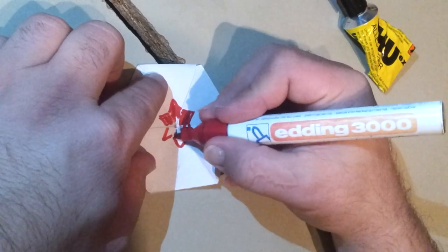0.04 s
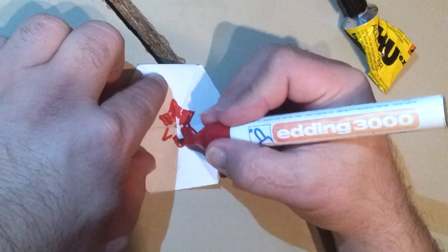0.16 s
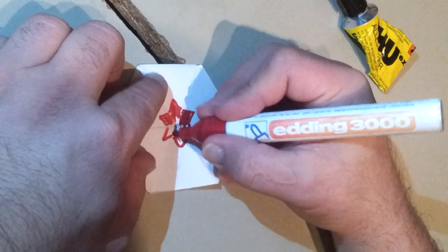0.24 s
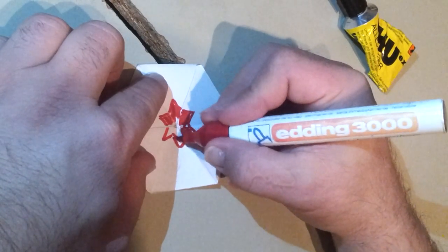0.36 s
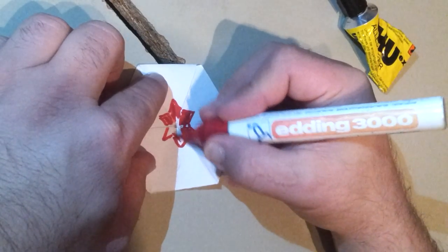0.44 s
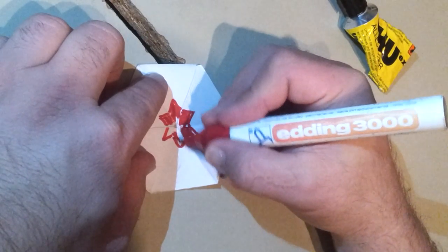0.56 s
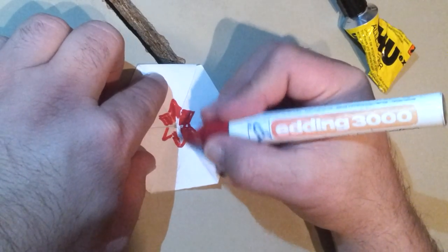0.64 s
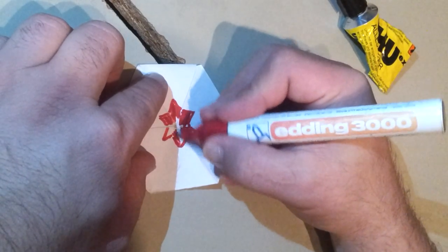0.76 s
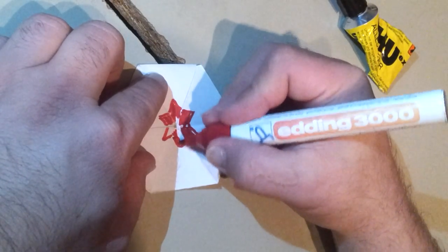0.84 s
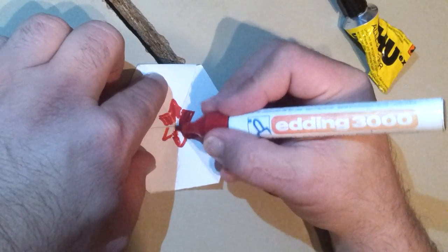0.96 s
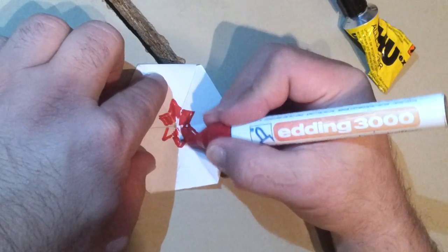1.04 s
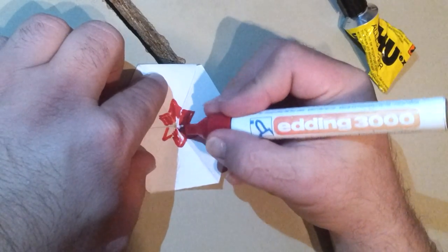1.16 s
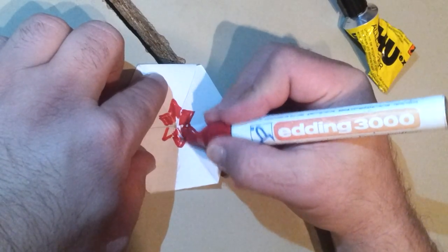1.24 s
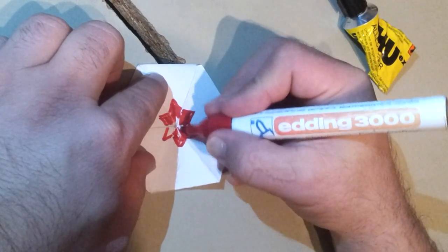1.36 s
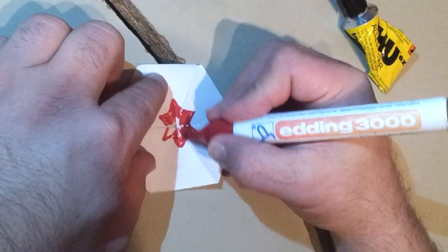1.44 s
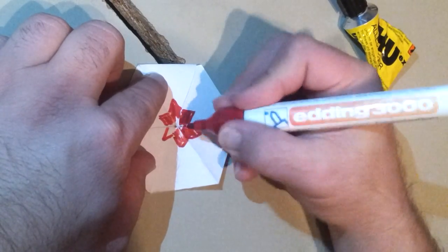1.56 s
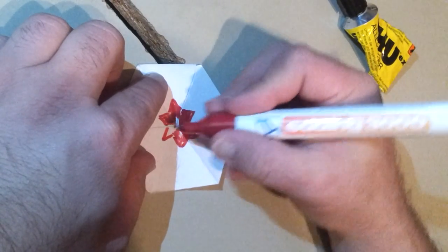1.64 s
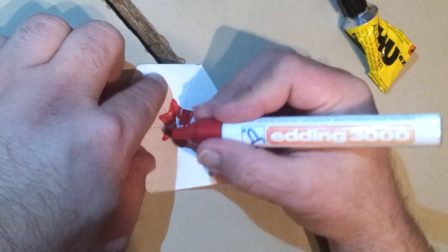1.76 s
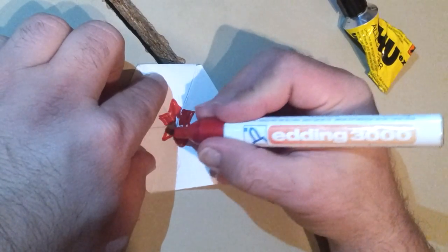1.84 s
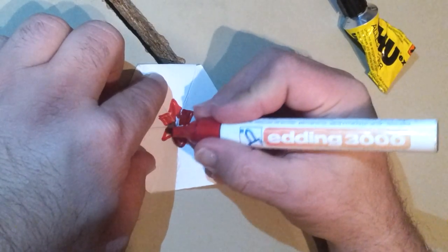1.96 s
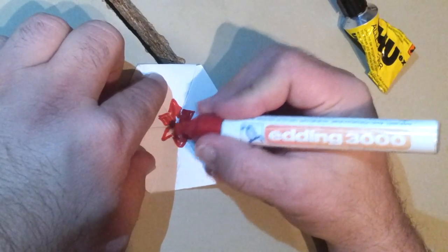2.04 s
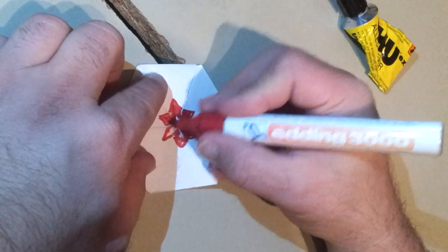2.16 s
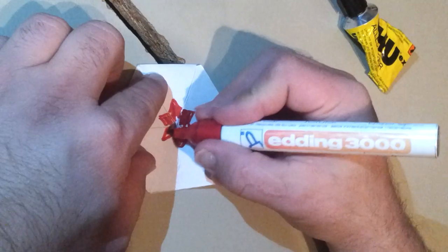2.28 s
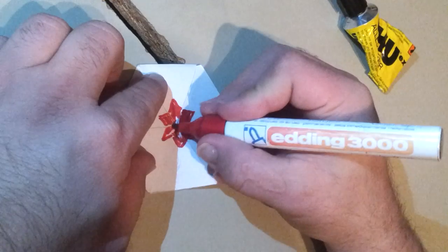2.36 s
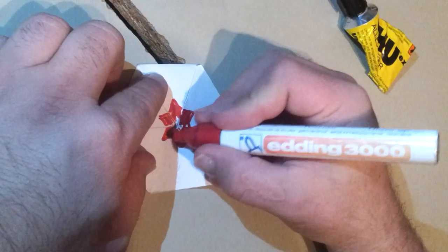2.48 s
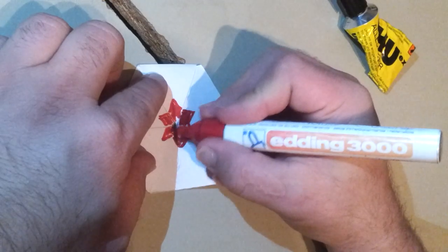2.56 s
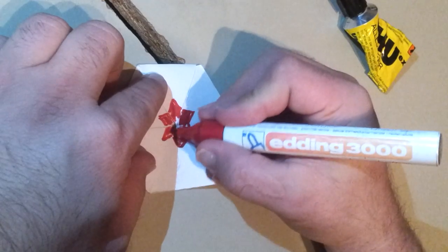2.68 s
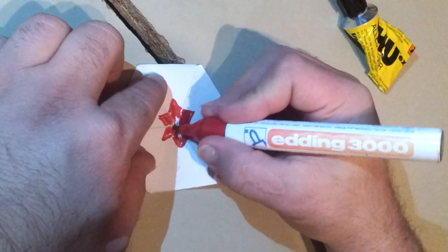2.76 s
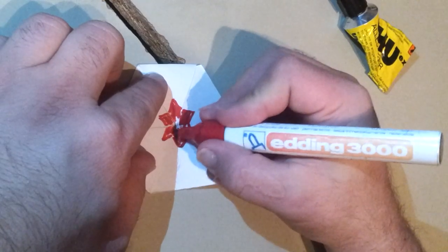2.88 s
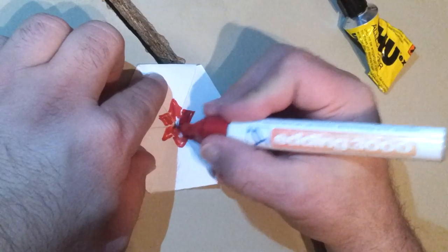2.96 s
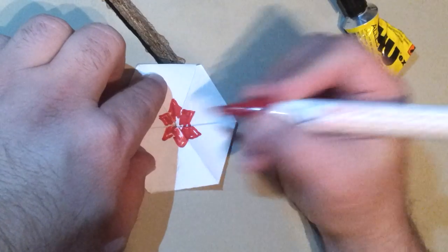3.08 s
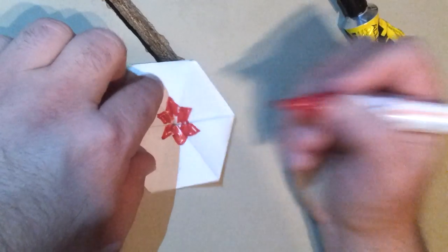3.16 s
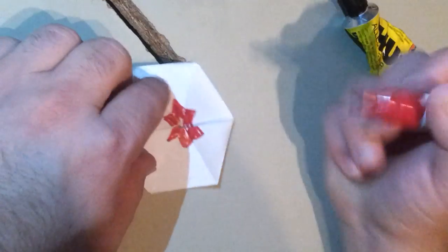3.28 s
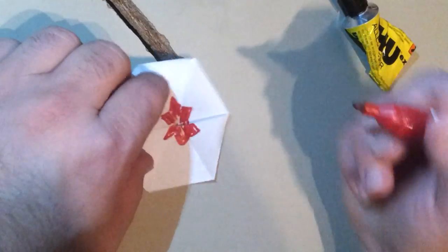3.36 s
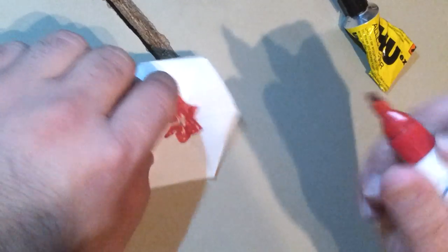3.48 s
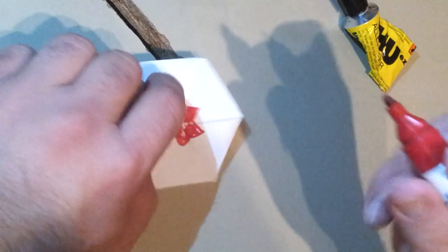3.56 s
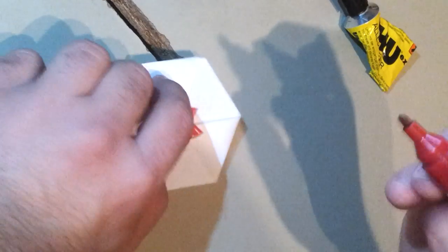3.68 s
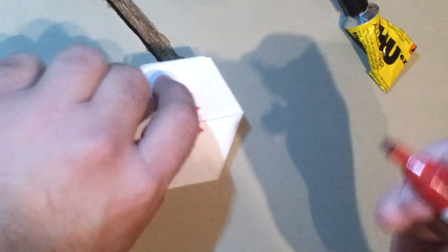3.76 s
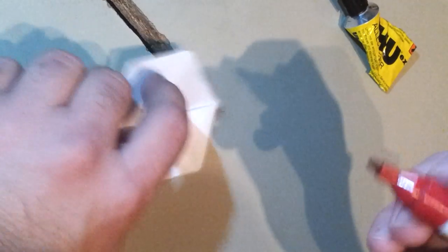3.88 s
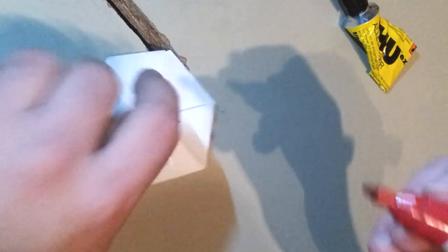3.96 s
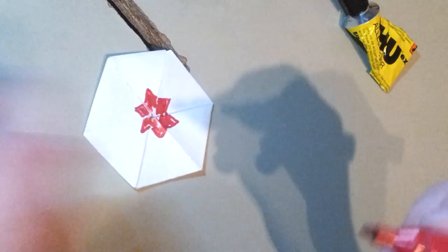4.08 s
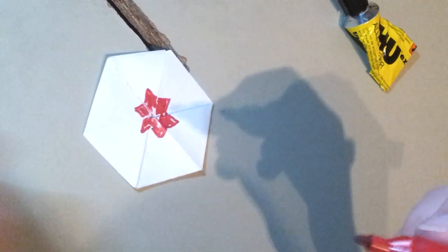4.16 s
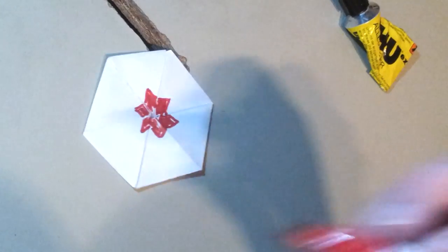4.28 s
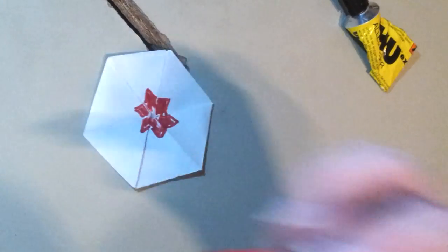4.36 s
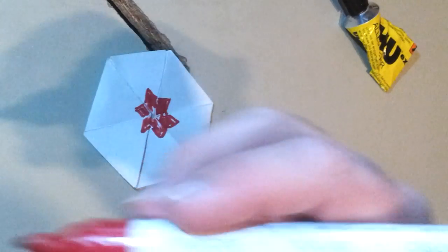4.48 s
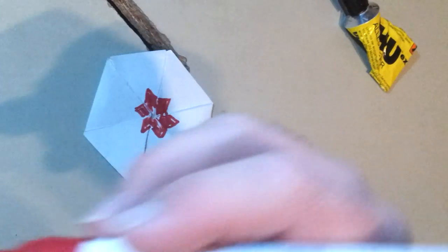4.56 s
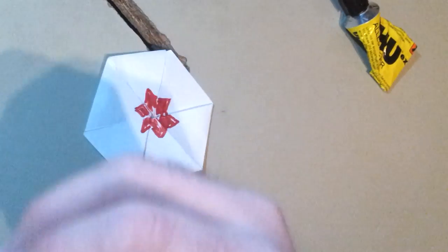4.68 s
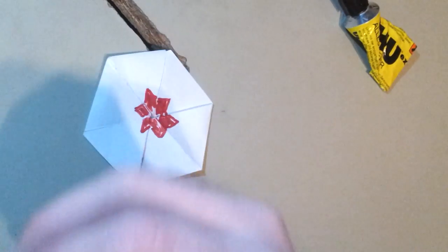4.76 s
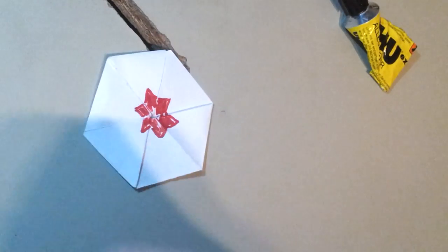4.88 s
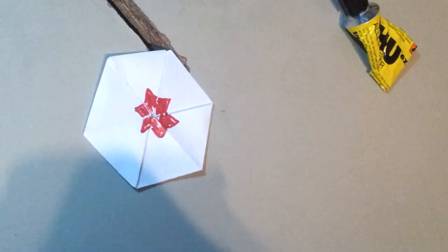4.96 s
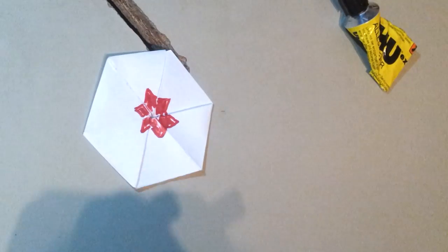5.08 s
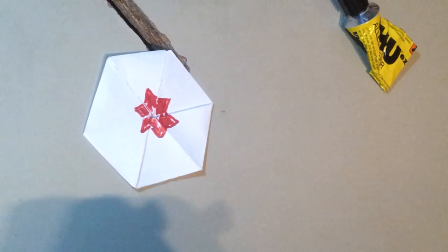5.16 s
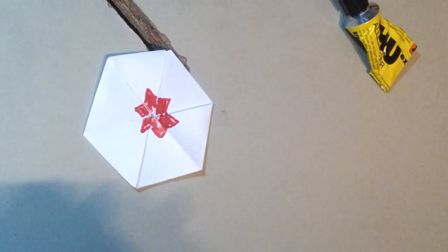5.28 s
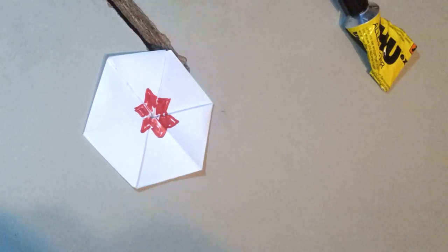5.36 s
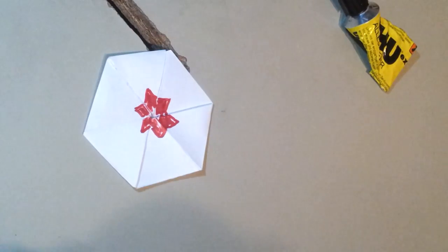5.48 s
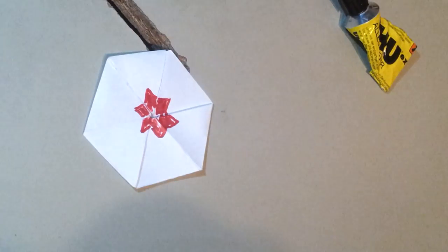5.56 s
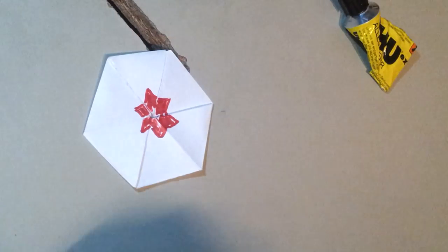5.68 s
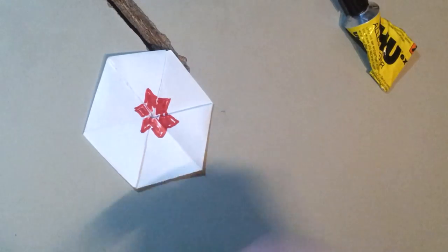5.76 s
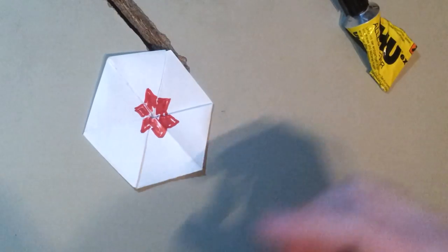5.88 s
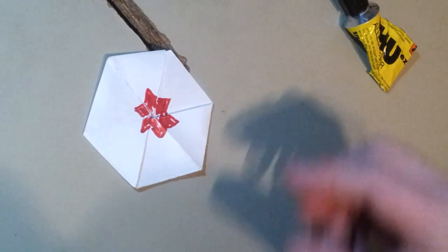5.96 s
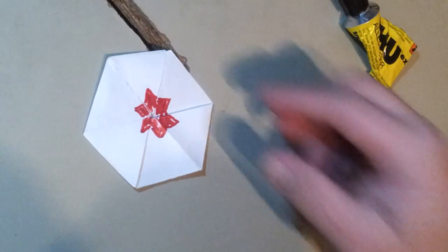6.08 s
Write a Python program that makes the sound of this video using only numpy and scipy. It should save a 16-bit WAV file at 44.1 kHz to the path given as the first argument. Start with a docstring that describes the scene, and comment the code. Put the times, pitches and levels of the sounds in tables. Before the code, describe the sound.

A felt-tip marker scratches paper in quick short strokes, then its cap snaps on sharply and two loud hard clacks ring in a small room.

```python
"""Room noise, a rustle of arms and a soft rub of skin on paper open the scene.
A felt-tip marker then colours in a small paper shape on a table, in two runs of short strokes:
random slips of the felt ring nib and barrel and rasp in the sheet. A faint hollow tone comes and goes.
The hands let go of the paper; the cap is pushed on and snaps home as ringing modes; arms shift about.
A low sine hum swells, the marker knocks the table, and something hard clacks twice in the small room."""
import sys
import numpy as np
from scipy import signal
from scipy.fft import rfft, irfft, next_fast_len
from scipy.io import wavfile

SR = 44100
rng = np.random.default_rng(int(sys.argv[2]) if len(sys.argv) > 2 else 0)


def materialize(psi):
    """Save the field psi as 16-bit PCM at rate SR to the path in sys.argv[1].

    A 1-D psi becomes a single channel; in a 2-D psi each row is a channel.
    """
    bounded = np.clip(np.atleast_2d(psi).T, -1, 1)
    quanta = np.round(bounded * 32767).astype(np.int16)
    wavfile.write(sys.argv[1], SR, quanta)


N = 269876
TIME = np.arange(N) / SR  # seconds

# colour of the steady room noise: hz, relative_db
AIR_SPECTRUM = [(20, -7.5), (55, -0.5), (110, -5.5), (300, -13), (550, -16.5), (800, -16), (1100, -20),
                (2200, -25), (4500, -28), (7500, -35)]
AIR_DB = -54
# swells of the low hum: start_s, length_s, level_db
HUM_SWELLS = [(3.5, 0.91, -47.5), (4.42, 0.86, -43), (5.31, 0.41, -46.5), (5.74, 0.45, -49.5)]
# the hum's pitch climbs steadily from the start of its first swell
HUM_HZ, HUM_RISE_HZ_PER_S = 46.2, 2.5
# the hum's level wavers: depth in dB, random points per second
HUM_WAVER_DB, HUM_WAVER_RATE = 1, 10

# how busily the arms move, as the level of their rustle: time_s, level_db
MOTION = [(0, -63), (.5, -76), (2.2, -68), (2.7, -63), (3.4, -62), (4.2, -54.5), (5.3, -53), (5.7, -48.5),
          (6.12, -49)]
# heavier shifts of the arms on the table: start_s, length_s, rumble_level_db
SHIFTS = [(0, .33, -58), (4.35, 0.16, -49.5), (4.62, 0.79, -50.5), (5.25, 0.89, -46)]
# swells of a thin hiss: start_s, length_s, level_db
HISS_SWELLS = [(4.48, 0.54, -53), (5.42, 0.43, -58)]
# colours of the arms' rumble, rustle and hiss: hz, relative_db
RUMBLE_SPECTRUM = [(40, -8.5), (90, -3), (150, 3.5), (220, -7), (320, -18), (600, -21), (1200, -20.5)]
RUSTLE_SPECTRUM = [(250, -2), (550, -4.5), (780, 2), (1000, -5), (1300, -5.5), (2000, -11.5), (3200, -19),
                   (4200, -24), (7500, -21.5)]
HISS_SPECTRUM = [(2000, -8.5), (4200, -8.5), (4680, 1), (5100, -5), (5600, -1.5), (6400, -8.5), (7500, -16)]
# rumble and hiss that go with any movement, dB relative to the rustle
MOTION_RUMBLE_DB, MOTION_HISS_DB = -8.5, -11

# soft rub of skin before the first stroke: start_s, length_s, level_db
RUBS = [(.0, 0.42, -65)]
RUB_HZ, RUB_WIDTH_HZ = 1930, 290
# fingers sliding off the paper: start_s, length_s, level_db
FINGER_SLIDES = [(3.622, .07, -61), (4.24, 0.07, -60), (4.317, 0.09, -48.5)]
# small ticks, and a knock of the marker on the table (the loudest row): start_s, peak_db, centre_hz
TICKS_AND_KNOCK = [(3.497, -44, 5600), (3.527, -42, 1200), (3.639, -44, 3000), (3.7118, -36, 4800),
                   (3.738, -45, 4200), (3.764, -44, 4500), (3.91, -41.5, 6000), (3.985, -44, 3900),
                   (4.219, -36.5, 1120), (4.265, -41, 2550), (5.5891, -25, 1780), (5.913, -35, 5130)]

# strokes of the nib, effort over an ordinary stroke: start_s, length_s, effort_db
STROKES = [(.283, 0.091, -13), (.387, .09, -6), (0.501, 0.13, -2), (0.627, 0.059, -2), (0.731, 0.12, -5.5),
           (0.851, 0.11, -2), (0.959, 0.085, 1.5), (1.072, .11, 2), (1.177, 0.086, -6.5), (1.24, 0.058, 3),
           (1.325, 0.094, 0), (1.425, 0.044, 2.5), (1.461, 0.056, 0.5), (1.546, .1, 1), (1.663, 0.091, 4.5),
           (1.762, 0.069, 3.5), (1.825, .06, -14), (2.364, 0.068, 4.5), (2.535, 0.091, -6.5),
           (2.627, 0.11, 1), (2.75, .1, 2.5), (2.878, .095, -2.5), (3.006, 0.071, 0), (3.084, 0.053, -0.5),
           (3.199, 0.092, -8), (3.28, .033, -6)]
# colour of the rasping paper: hz, relative_db
PAPER_SPECTRUM = [(300, -5), (800, -6), (1250, -6), (1600, 2.5), (2300, -6.5), (2700, -2), (3200, -3),
                  (3750, 0), (4500, -1.5), (6000, 1.5), (7500, -9.5)]
# resonances of the nib: hz, width_hz, first_grip_db, second_grip_db
NIB_MODES = [(5240, 310, -4.5, -23), (5750, 590, -4, -28), (5970, 270, -4, -0.5), (6240, 330, 0.5, -3),
             (6730, 340, -4, -10), (7430, 820, 0, -2.5)]
BARREL_HZ, BARREL_WIDTH_HZ = 4610, 360
REGRIP_S = 2.1
# level in dB of an ordinary stroke: nib, then paper and barrel as (first grip, second grip)
NIB_DB = -53
RASP_DB, BARREL_DB = (-57, -56.5), (-58.5, -65)
# paper and barrel grow more slowly with effort than the nib does (dB per dB)
RASP_GROWTH, BARREL_GROWTH = 0.7, 0.39
# the barrel gains level with every second a stroke outlasts STROKE_S
BARREL_DB_PER_S, STROKE_S = 47, 0.094

# faint hollow tone that comes and goes: start_s, length_s, level_db
HOLLOW_SWELLS = [(2.764, 0.12, -58.5), (3.054, 0.093, -58.5), (3.162, 0.068, -56.5), (3.9, 0.27, -58.5),
                 (4.4, 0.13, -59.5), (4.934, 0.23, -59)]
HOLLOW_HZ, HOLLOW_WIDTH_HZ = 712, 50

# cap scraping on the barrel: start_s, length_s, level_db
CAP_SCRAPES = [(4.719, 0.025, -33.5)]
# cap meeting its seat: start_s, peak_db
SEATS = [(4.7375, -18), (4.7389, -13)]
# modes of the loose cap, before the pitch factor: hz, relative_db, t60_s
SEAT_MODES = [(980, -22, 0.045), (1304, -12.5, 0.021), (1473, -11, 0.044), (1956, -3, 0.037),
              (1940, -5, 0.015), (2560, -8.5, 0.019), (2780, -8.5, 0.049), (3700, -8.5, 0.02),
              (3910, -9, 0.018), (4200, -0.5, 0.018), (5100, -10, 0.015), (5490, -15, 0.013),
              (6600, -30, .014)]
# cap snapping home: start_s, peak_db, pitch_factor
SNAPS = [(5.0128, -5.5, 0.95), (5.0253, -18.5, 0.98), (5.0300, -14.5, 0.848)]
# modes of the closed cap, before the pitch factor: hz, relative_db, t60_s
SNAP_MODES = [(1870, -17.5, 0.01), (2340, -16, 0.015), (2910, -22, 0.0098), (3280, -9.5, 0.014),
              (4114, -2, 0.019), (4340, -5, 0.014), (4790, -12.5, 0.011), (5890, -9, 0.01),
              (6300, -9.5, 0.011), (7290, -13.5, 0.022)]
# colours of the cap's contact noise and of the room's wash after it: hz, relative_db
CAP_CRACK = [(400, -31), (1500, -15), (3500, 8), (7500, 1)]
CAP_WASH = [(600, -19), (1400, -3.5), (2200, 0), (3200, -4.5), (3900, 2.5), (4700, -8), (7300, -20)]

# hard clacks: start_s, peak_db, pitch_factor
CLACKS = [(6.027, 4, 1.0), (6.1044, 2, 1.02)]
# modes of the clacking piece, before the pitch factor: hz, relative_db, t60_s
CLACK_MODES = [(1060, -33, 0.016), (2050, -9, 0.013), (2830, -13, 0.017), (3700, -18, 0.0113),
               (4390, -7, 0.016), (5030, 1, 0.0062), (6190, 9, 0.0083), (6520, -3.5, 0.012),
               (7010, -3, 0.014)]
# colour of its rattling contact: hz, relative_db
CLACK_CRACK = [(100, -25.5), (280, -13.5), (480, -18), (800, -2), (1300, -10.5), (2100, -5), (3500, -2),
               (5000, 1), (5800, -2.5), (6450, 5), (7300, -1)]
# wall echoes of a clack, level against the direct blow: delay_s, relative_db
ECHOES = [(.009, -13), (.0108, -16.5), (0.012, -13), (0.02, -17), (.0235, -13.5), (0.0337, -20.5)]
# the room's wash after a clack: dB relative to the blow, 60 dB decay in seconds
WASH_DB, WASH_T60_S = -19.5, 0.32

# colour of the room's reverberation: hz, relative_db
ROOM_SPECTRUM = [(200, -16), (800, 12.5), (1500, -1.5), (3000, -1), (5000, -1), (7500, 1)]
ROOM_T60_S = 0.27
# treble rolloff of the whole mix: hz, gain_db
TREBLE = [(7100, 0), (7450, -8), (7800, -15)]
TOP_HZ = 7850
OVERLOAD = .6  # amplitude ceiling of the soft rounding


def undb(db):
    """Decibels to gain."""
    return 10 ** (np.asarray(db) / 20)


def unit(x):
    """Scale to rms 1."""
    return x / np.sqrt(np.mean(x ** 2))


def curves(table):
    """Each column of a table, joined by straight lines in time."""
    s, *columns = np.transpose(table)
    return [np.interp(TIME, s, column) for column in columns]


def colour(x, spectrum):
    """Filter by a spectrum of (hz, db) points, joined on a log frequency axis."""
    hz, db = np.transpose(spectrum)
    size = next_fast_len(len(x))
    f = np.fft.rfftfreq(size, 1 / SR)
    gain = undb(np.interp(np.log(f + 1), np.log(hz), db))
    return irfft(rfft(x, size) * gain, size)[:len(x)]


def resonate(x, hz, width_hz):
    """One resonance, gain 1 at its centre."""
    b, a = signal.iirpeak(hz, hz / min(width_hz, SR / 4), fs=SR)
    return signal.lfilter(b, a, x)


def walk(rate):
    """Random drift: normal values, rate per second, joined by straight lines."""
    count = int(N / SR * rate) + 2
    return np.interp(TIME * rate, np.arange(count), rng.standard_normal(count))


def grains(rate, spread_db):
    """Tiny slips of uneven size at random moments, rate per second on average."""
    hit = rng.random(N) < rate / SR
    size = rng.standard_normal(N) * undb(spread_db * rng.standard_normal(N))
    return hit * size


def add(track, s, sound):
    """Mix a sound into the track at time s."""
    i = int(s * SR)
    track[i:i + len(sound)] += sound[:max(N - i, 0)]


def swells(table, shape=1):
    """Level arcs from (start_s, length_s, peak_db): each rises from rest and returns to rest."""
    out = np.zeros(N)
    for s, length, db in table:
        arc = np.sin(np.linspace(0, np.pi, int(length * SR))).clip(0) ** shape
        add(out, s, undb(db) * arc)
    return out


def grip(first_db, second_db):
    """A gain that changes when the marker is gripped anew between the two runs."""
    return np.where(TIME < REGRIP_S, undb(first_db), undb(second_db))


def ring(modes, pitch, crack, crack_db, crack_s):
    """One blow: damped modes that peak at 1, and a short crack of contact noise."""
    t = TIME[:SR // 16]
    body = np.zeros(len(t))
    for k, (hz, db, t60) in enumerate(modes):
        # neighbouring modes start in opposite directions
        body += (-1) ** k * undb(db - 60 * t / t60) * np.sin(2 * np.pi * hz * pitch * t)
    noise = unit(colour(rng.standard_normal(len(t)), crack + [(9000, -37)]))
    return body / np.abs(body).max() + undb(crack_db) * noise * np.exp(-t / crack_s)


def wash(spectrum, t60):
    """The room's dense answer to one blow: coloured noise that builds up and dies away."""
    t = TIME[:SR // 3]
    noise = unit(colour(rng.standard_normal(len(t)), spectrum + [(9000, -34)]))
    return noise * undb(-60 * t / t60) * np.clip(t / 0.0029, 0, 1)


def reverb(x, wet_db):
    """The diffuse tail of a small room, building up over its first 2.2 ms."""
    t = TIME[:SR // 2]
    noise = colour(rng.standard_normal(len(t)), ROOM_SPECTRUM)
    tail = noise * undb(-60 * t / ROOM_T60_S) * np.clip(t / 0.0022, 0, 1)
    tail = tail / np.sqrt(np.sum(tail ** 2))
    return undb(wet_db) * signal.fftconvolve(x, tail)[:N]


def background():
    """Steady room noise, and a low sine hum that comes in swells and slowly rises."""
    hz = HUM_HZ + HUM_RISE_HZ_PER_S * (TIME - HUM_SWELLS[0][0])
    tone = np.sqrt(2) * np.sin(2 * np.pi * np.cumsum(hz) / SR)  # rms 1
    waver = undb(HUM_WAVER_DB * walk(HUM_WAVER_RATE))
    hum = tone * swells(HUM_SWELLS, shape=0.61) * waver
    air = unit(colour(rng.standard_normal(N), AIR_SPECTRUM + [(9000, -72)]))
    return hum + air * undb(AIR_DB + 0.41 * walk(4.37))


def arms():
    """Arms and clothes move: a soft rustle, a bumpy rumble as weight shifts, and a thin hiss."""
    motion = undb(curves(MOTION)[0])
    rumble = unit(colour(grains(rate=410, spread_db=3.5), RUMBLE_SPECTRUM + [(4000, -83)]))
    rustle = unit(colour(grains(rate=7400, spread_db=0.0), RUSTLE_SPECTRUM + [(9000, -58.5)]))
    hiss = unit(colour(rng.standard_normal(N), HISS_SPECTRUM + [(9000, -47)]))
    # the share that follows any movement and the separate swells add as powers
    rumble_level = np.hypot(motion * undb(MOTION_RUMBLE_DB), swells(SHIFTS))
    hiss_level = np.hypot(motion * undb(MOTION_HISS_DB), swells(HISS_SWELLS))
    flicker = undb(1.5 * walk(25))
    return rustle * motion * flicker + rumble * rumble_level + hiss * hiss_level


def slides_and_ticks():
    """Skin slides over the sheet as tiny slips; noise bursts ring as small ticks and a table knock."""
    slips = grains(rate=5400, spread_db=-1.0)
    out = unit(colour(slips, PAPER_SPECTRUM + [(9000, -47)])) * swells(FINGER_SLIDES)
    out += unit(resonate(slips, RUB_HZ, RUB_WIDTH_HZ)) * swells(RUBS)
    t = TIME[:SR // 30]
    for s, db, hz in TICKS_AND_KNOCK:
        burst = rng.standard_normal(len(t)) * np.exp(-t / 0.002)
        tap = resonate(burst, hz, 0.42 * hz)
        add(out, s, undb(db) * tap / np.abs(tap).max())
    return out + reverb(out, wet_db=-5.0)


def marker():
    """Felt catches on paper fibres; slips ring nib and barrel and rasp in the sheet, set by effort."""
    slips = grains(rate=9000, spread_db=0.0)
    flutter = undb(2.3 * walk(170))

    def rung(hz, width_hz):
        """One resonance, stirred by its own run of slips; it wavers as the nib rolls."""
        own = np.roll(slips, rng.integers(N)) * flutter
        twice = resonate(resonate(own, hz, width_hz), hz, width_hz)
        return twice * undb(2.2 * walk(20))

    def drive(growth, db_per_s=0):
        """Every stroke speeds up and slows down again; its effort sets the height."""
        arcs = []
        for s, length, effort in STROKES:
            arcs.append((s, length, growth * effort + db_per_s * (length - STROKE_S)))
        return swells(arcs, shape=0.92)

    nib = unit(sum(rung(hz, width) * grip(first, second) for hz, width, first, second in NIB_MODES))
    barrel = unit(rung(BARREL_HZ, BARREL_WIDTH_HZ))
    sheet = unit(colour(slips * flutter, PAPER_SPECTRUM + [(9000, -40)]))
    strokes = undb(NIB_DB) * nib * drive(1)
    strokes += grip(*RASP_DB) * sheet * drive(RASP_GROWTH)
    strokes += grip(*BARREL_DB) * barrel * drive(BARREL_GROWTH, BARREL_DB_PER_S)
    return strokes + reverb(strokes, wet_db=-8.5)


def hollow():
    """A faint, unsteady tone: one narrow resonance stirred by noise, filtered twice."""
    tone = rng.standard_normal(N)
    for _ in range(2):
        tone = resonate(tone, HOLLOW_HZ, HOLLOW_WIDTH_HZ)
    return unit(tone) * swells(HOLLOW_SWELLS)


def cap():
    """The cap scrapes along the barrel, meets its seat, then snaps over the rim, ringing its modes."""
    slips = grains(rate=6600, spread_db=2.0)
    scrape = unit(sum(undb(db) * resonate(slips, hz, 350) for hz, db, _ in SEAT_MODES))
    out = scrape * swells(CAP_SCRAPES)
    room = np.zeros(N)
    for s, db in SEATS:
        blow = ring(SEAT_MODES, 0.99, CAP_CRACK, crack_db=-30, crack_s=.0035)
        add(out, s, undb(db) * blow)
        add(room, s, undb(db - 27.5) * wash(CAP_WASH, 0.28))
    for s, db, pitch in SNAPS:
        blow = ring(SNAP_MODES, pitch, CAP_CRACK, crack_db=-12.0, crack_s=0.0029)
        add(out, s, undb(db) * blow)
        add(room, s, undb(db - 35.0) * wash(CAP_WASH, 0.17))
    return out + room + reverb(out, wet_db=-12)


def clacks():
    """Two hard blows further off: each wall returns a scattered echo, then the room washes on."""
    out = np.zeros(N)
    for s, db, pitch in CLACKS:
        for delay, echo_db in [(0, 0)] + ECHOES:  # the direct blow comes first
            blow = ring(CLACK_MODES, pitch, CLACK_CRACK, crack_db=-8.5, crack_s=0.0018)
            add(out, s + delay, undb(db + echo_db) * blow)
        add(out, s, undb(db + WASH_DB) * wash(CLACK_CRACK, WASH_T60_S))
    return out


def scene():
    """All sources mixed into one channel."""
    mix = background() + arms() + slides_and_ticks() + marker() + hollow() + cap() + clacks()
    return mix[None]


def record(dry):
    """Soft saturation rounds the loudest peaks; a rolloff and a steep low-pass cut the treble."""
    rounded = OVERLOAD * np.tanh(dry[0] / OVERLOAD)
    padded = np.pad(rounded, (0, SR // 4))  # keeps the filter from wrapping the end to the start
    dulled = colour(padded, TREBLE)[None, :N]
    lowpass = signal.ellip(11, .2, 95, TOP_HZ, fs=SR, output="sos")
    return signal.sosfilt(lowpass, dulled)


dry = scene()
out = record(dry)
materialize(out)
```